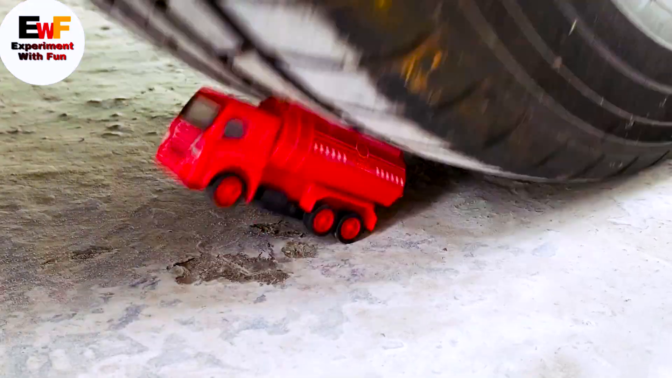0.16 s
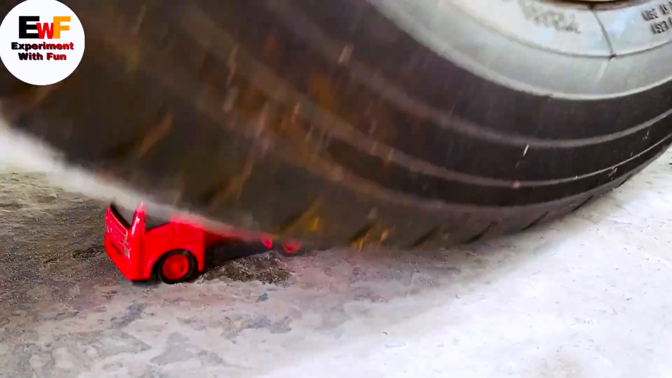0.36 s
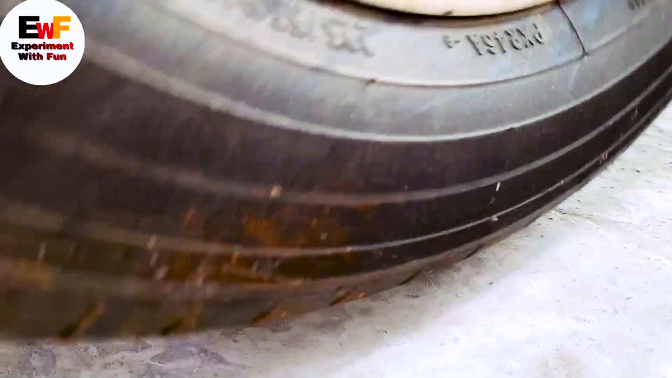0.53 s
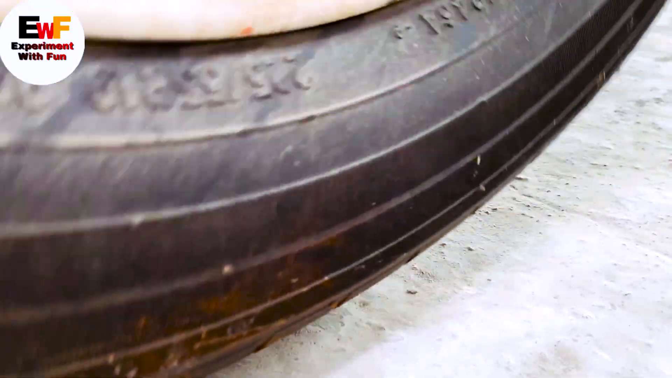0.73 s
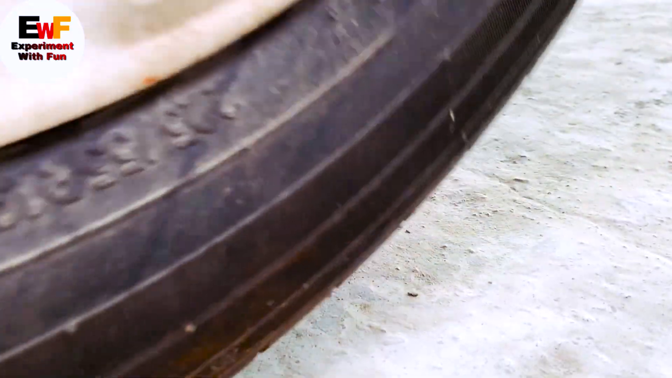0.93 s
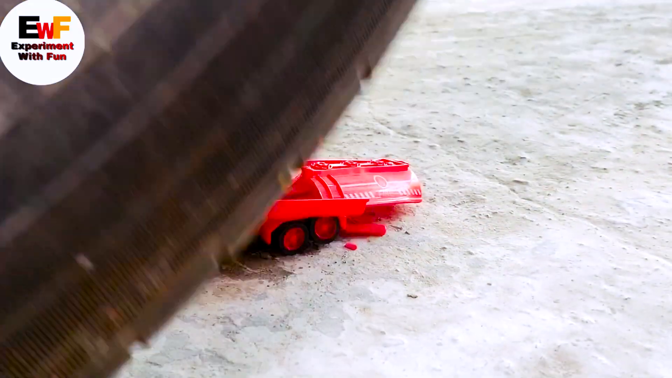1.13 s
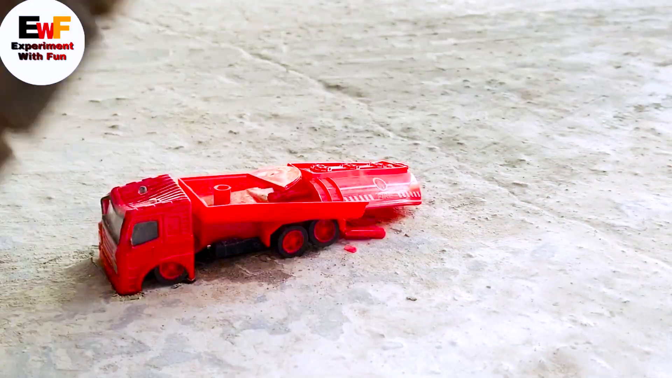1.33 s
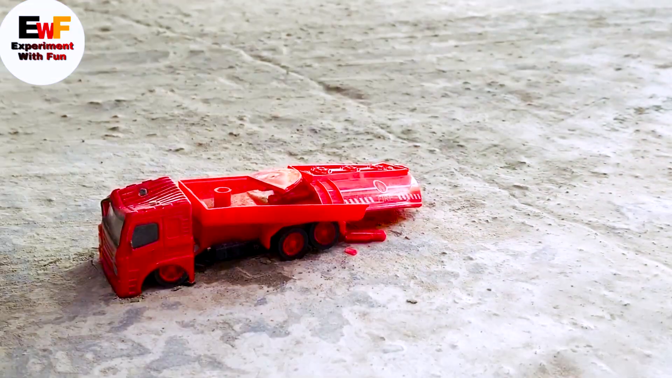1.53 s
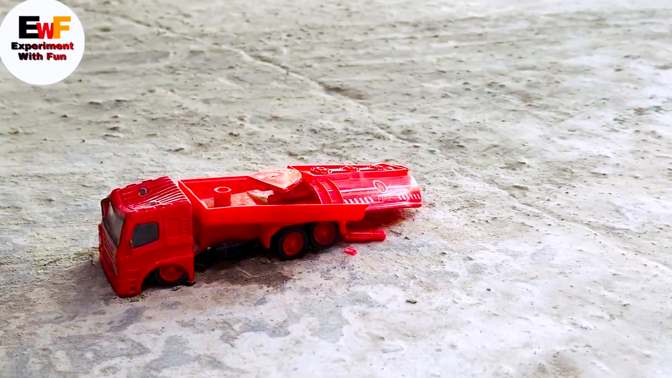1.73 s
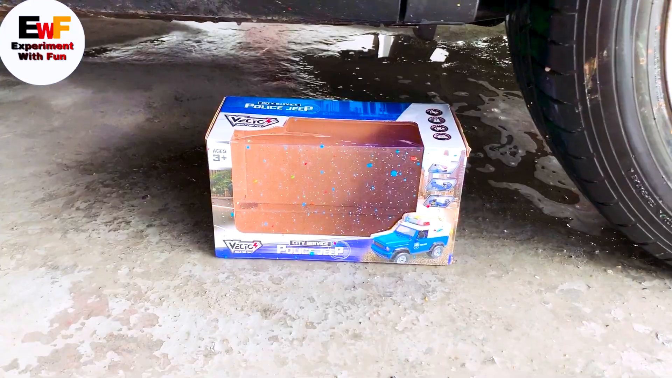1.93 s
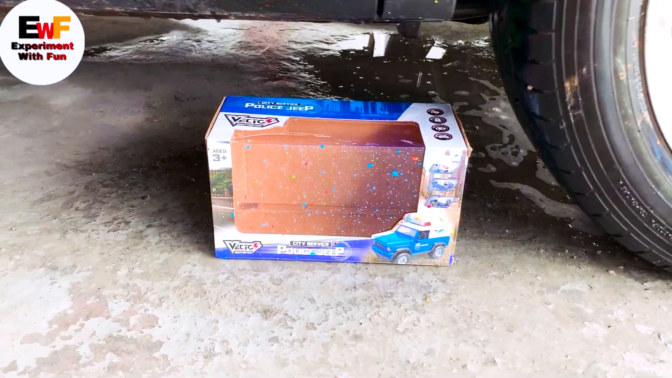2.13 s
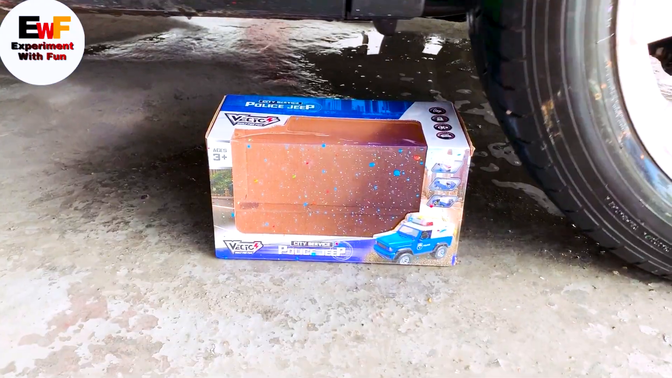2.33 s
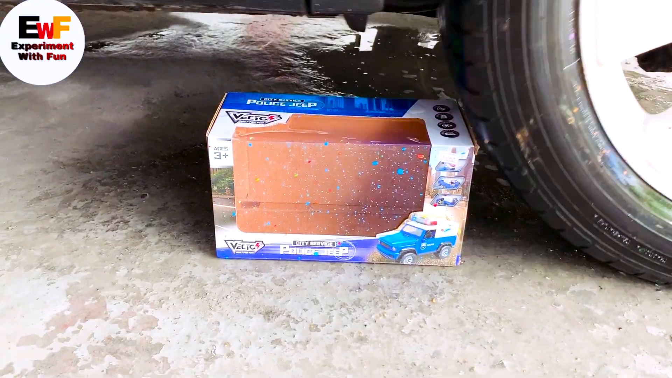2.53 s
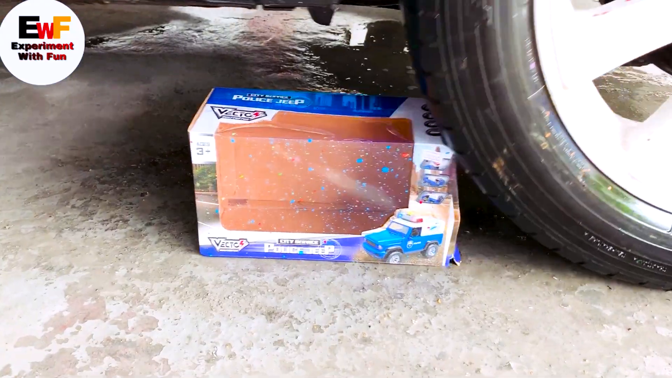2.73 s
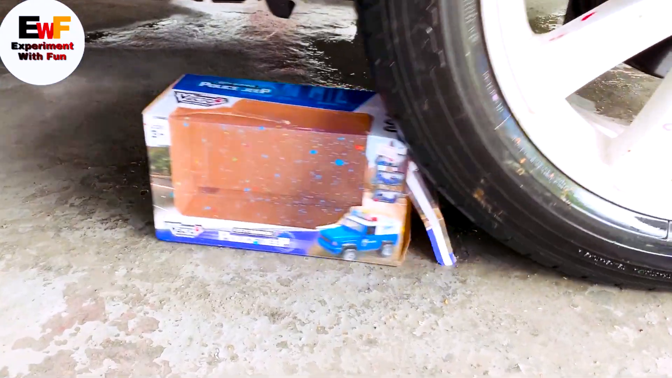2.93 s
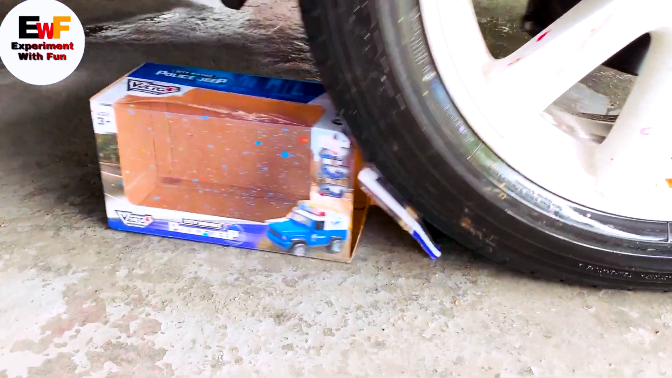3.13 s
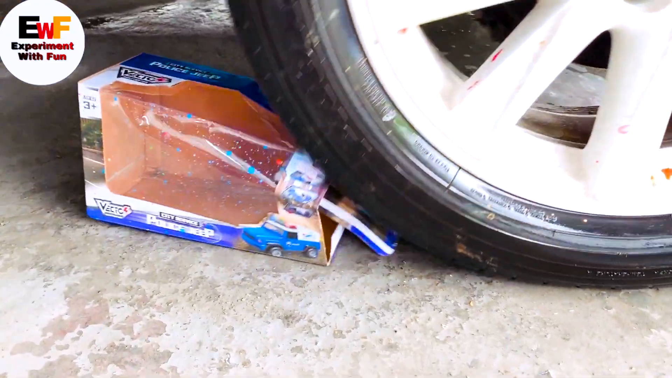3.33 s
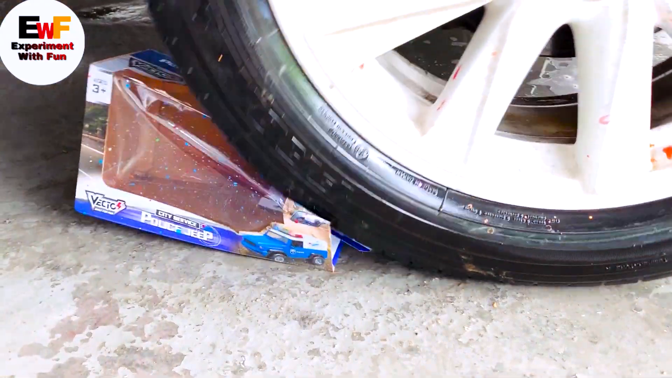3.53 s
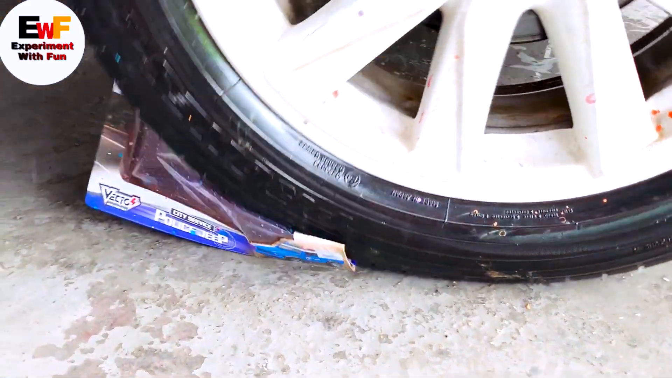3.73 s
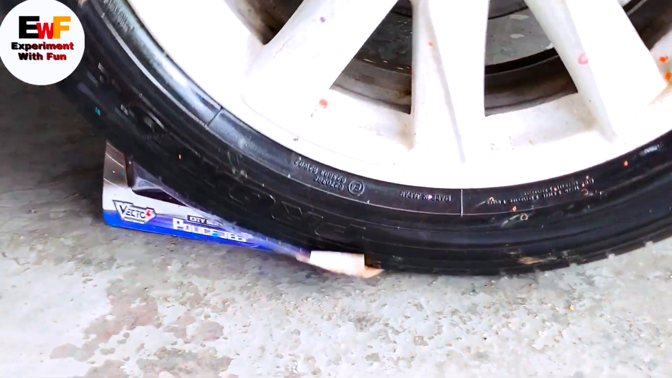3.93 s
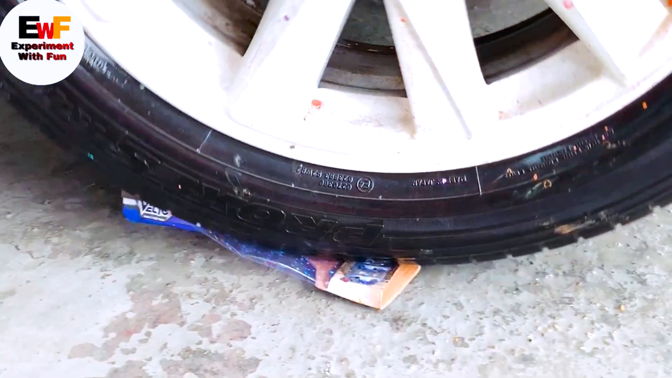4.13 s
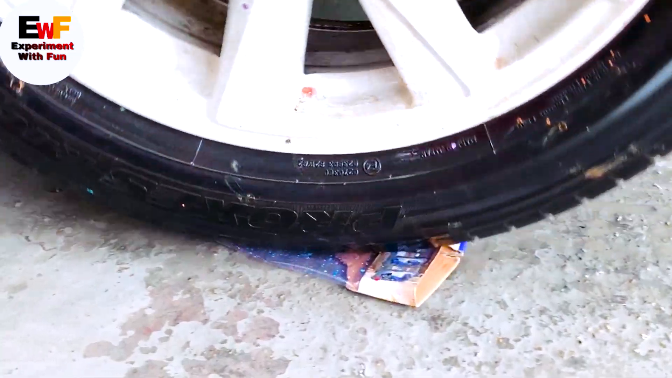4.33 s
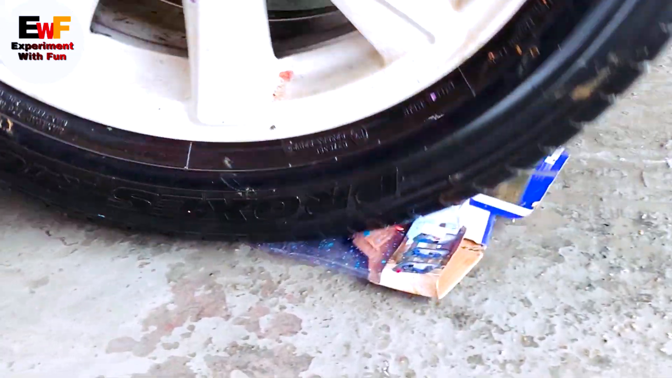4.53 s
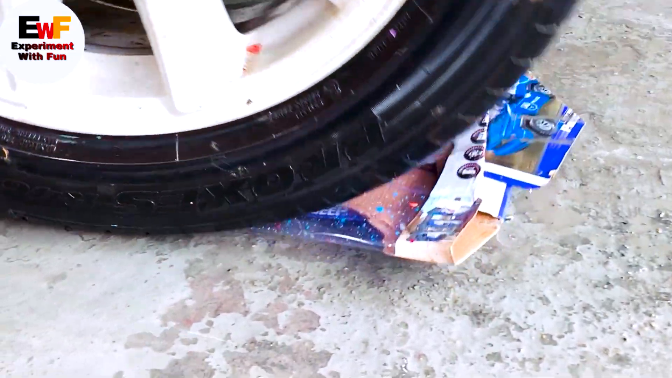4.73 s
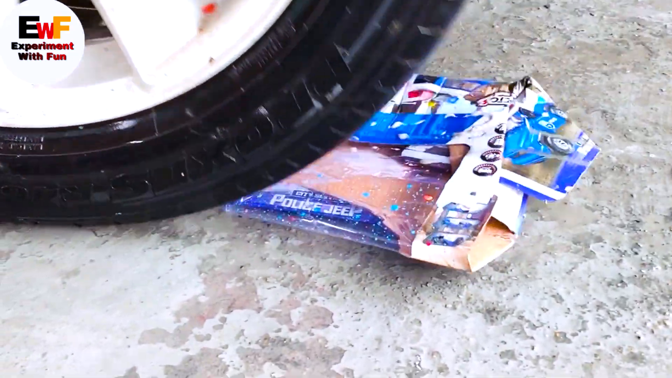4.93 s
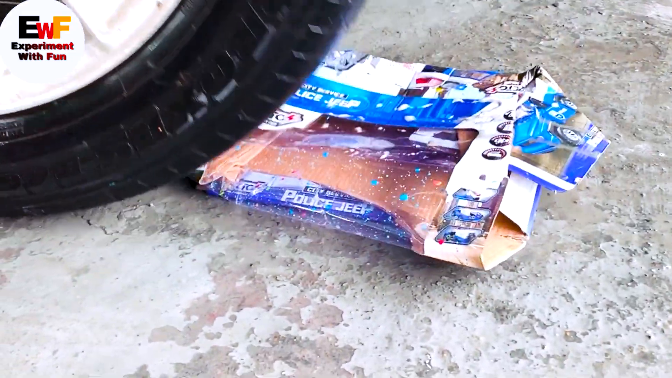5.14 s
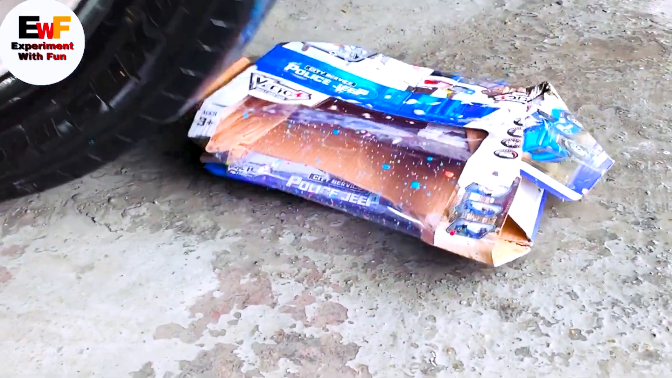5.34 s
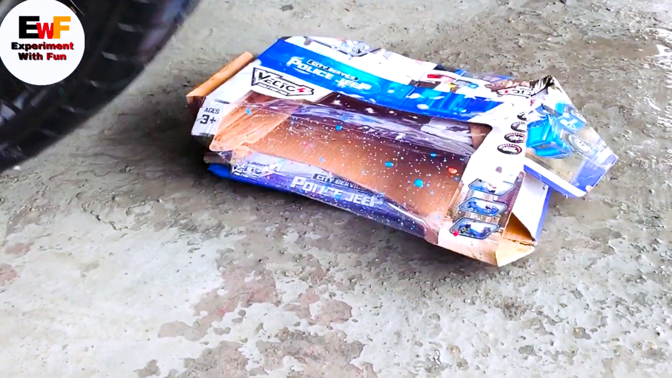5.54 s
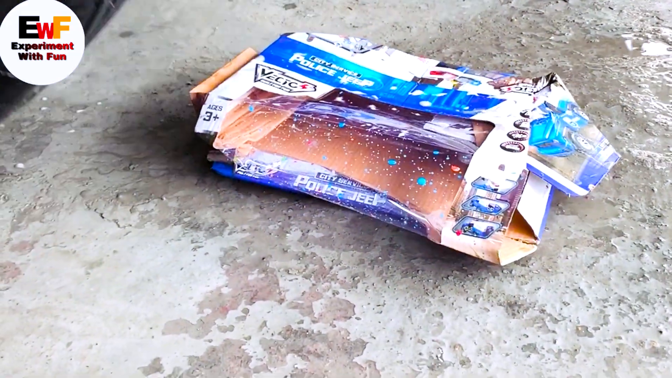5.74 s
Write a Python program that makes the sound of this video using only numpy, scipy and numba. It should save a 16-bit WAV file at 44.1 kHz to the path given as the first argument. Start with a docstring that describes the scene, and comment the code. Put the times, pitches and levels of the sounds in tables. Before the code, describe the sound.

Over a low engine rumble, hard plastic cracks sharply under a tyre, then cardboard buckles, scrapes and crunches before a brake squeals faintly.

```python
"""An idling car, and at once a plastic toy lorry snapping under its tyre, whose air cavity rings on.
In a second scene the tyre crushes a cardboard box: it rumbles, scrapes and thuds, its plastic window
crackles, then a brake squeals. Both play out on concrete, heard from ground level through the two
microphone ports of a phone. The loudest blows overload the microphone."""
import sys
import numpy as np
from scipy import signal
from scipy.fft import rfft, irfft
from scipy.io import wavfile
from scipy.ndimage import uniform_filter1d
from numba import njit

SR = 44100
rng = np.random.default_rng(int(sys.argv[2]) if len(sys.argv) > 2 else 0)


def materialize(psi):
    """Save the field psi as 16-bit PCM at rate SR to the path in sys.argv[1].

    A 1-D psi becomes a single channel; in a 2-D psi each row is a channel.
    """
    bounded = np.clip(np.atleast_2d(psi).T, -1, 1)
    quanta = np.round(bounded * 32767).astype(np.int16)
    wavfile.write(sys.argv[1], SR, quanta)


N = 254456
TIME = np.arange(N) / SR
BOX_SCENE_S, WINDOW_S = 1.805, 3.87  # the second scene opens; the tyre reaches the window film
TOY_SCENE = TIME < BOX_SCENE_S


# The toy snapping on the concrete. Each row: start in seconds, level in dB, shard pitch in Hz,
# hollow body and splinter treble in dB against that level, t60 in seconds.
TOY_SNAPS = [(0.075, -19, 2090, -15, -15, 0.08), (0.101, -13.5, 1250, -25.5, -21.5, 0.066),
             (0.128, -7.5, 1270, -21, -14, 0.057), (0.137, -2, 2040, -16.5, -15, 0.021),
             (0.177, 3.5, 2370, -18.5, -11.5, 0.078), (0.199, 7, 1980, -21.5, -10, 0.022),
             (0.217, 4, 1820, -28.5, -13, 0.093), (0.236, 2, 2310, -33.5, -12, 0.05),
             (0.268, -16, 4090, -24.5, 2, 0.017), (0.291, -1, 2740, -30, -7, 0.023),
             (0.308, -18.5, 2330, -14, -4.5, 0.029), (0.334, -1.5, 703, -15.5, -9.5, 0.021),
             (0.345, -16.5, 2505, -7, 0.5, 0.073), (0.376, 3.5, 856, -7, -12.5, 0.053),
             (0.425, -0.5, 703, -8.5, -10, 0.041), (0.458, -26.5, 773, -11, -1.5, 0.049),
             (0.482, -12.5, 775, -12, -10.5, 0.043), (0.495, -12, 727, -8.5, -8, 0.03),
             (0.511, -22.5, 721, -11.5, -0.5, 0.027), (0.559, -34, 703, -4, 10.5, 0.035),
             (0.589, 2.5, 778, -19, -19, 0.024), (0.627, -20, 754, -18.5, 5.5, 0.019),
             (0.701, -16.5, 1770, -20, -4, 0.021), (0.788, -25.5, 1560, -17, -13, 0.022),
             (0.819, -21, 4270, -23, -3, 0.035), (0.836, -15.5, 3160, -24, -6.5, 0.039),
             (0.872, 4, 773, -6.5, -7.5, 0.058), (0.999, -34, 2040, -15, -10, 0.035),
             (1.141, -43.5, 953, -16, -16.5, 0.056)]
# The toy's hollow, then its walls. Each row: resonance in Hz, width in Hz, gain in dB.
TOY_HOLLOW = [(383, 21, -8), (625, 47, -8), (780, 270, -16)]
TOY_WALLS = [(1440, 24, -11.5), (1817, 140, 2.5), (2480, 53, 4), (2750, 18, 3.5), (4180, 69, -18),
             (6600, 200, -10), (8270, 130, 7.5)]
# Its splintering treble. Each row: frequency in Hz, noise density in dB.
TOY_SPLINTERS = [(3530, -38.5), (6000, -8.5), (6920, -3), (7680, 2.5), (8340, -5), (8860, 8.5), (9940, 2.5),
                 (11200, -22.5), (15500, -30)]

def toy():
    """The hollow plastic lorry breaks under the tyre, snap by snap."""
    return cracks(TOY_SNAPS, TOY_HOLLOW, TOY_WALLS, TOY_SPLINTERS)


# The box on the concrete: its folds, hollow, walls and splintering treble. Rows read as for the toy.
BOX_FOLDS = [(2.643, -15.5, 1393, -4.5, -20, 0.054), (2.846, -5, 2170, -10.5, -18, 0.078),
             (2.873, -9.5, 840, -1, -2, 0.011), (2.881, 6, 810, -11.5, -19.5, 0.041),
             (3.251, 2.5, 1430, 1, -40, 0.096), (3.396, -10, 1270, -11.5, -35, 0.074),
             (3.504, 4, 3315, -14, -9, 0.026), (3.528, 0, 1240, -6, -16.5, 0.049),
             (3.587, 3.5, 1150, -9, -25, 0.026), (3.631, 1.5, 3400, -12, -11, 0.032),
             (3.704, 6.5, 1003, -9, -17, 0.032), (3.789, -4.5, 1460, -9, -32, 0.064),
             (3.846, -0.5, 1015, -12, -12, 0.082), (3.878, 4.5, 1370, -38, -7, 0.016),
             (3.884, -1, 1031, -7, -25, 0.06), (3.911, 0.5, 1114, -8, -9, 0.071),
             (3.924, 3, 1110, -10, -5, 0.018), (3.961, -5, 4100, -10.5, -2.5, 0.019),
             (3.979, 4, 1130, -10, -15, 0.029), (4.011, -2, 1170, -10.5, -5.5, 0.028),
             (4.06, -12, 1075, -6, -5, 0.073), (4.077, -9, 2900, -13, -3, 0.032),
             (4.115, -2.5, 2130, -20.5, -14, 0.019), (4.126, -4, 1720, -17, -6, 0.016),
             (4.142, 1, 1140, -20.5, -6.5, 0.035), (4.173, -7, 1100, -15.5, -7, 0.032),
             (4.185, 7, 713, -9.5, -10.5, 0.011), (4.199, -14, 1680, -7.5, 2, 0.061),
             (4.211, 2, 1101, -14, -6.5, 0.033), (4.239, 2, 1422, -27, -11, 0.015),
             (4.269, -2, 1410, -19.5, -14, 0.03), (4.283, -11.5, 1340, -12, -20, 0.024),
             (4.315, -5, 1630, -13, -26, 0.013), (4.348, 1, 1720, -19, -20, 0.049),
             (4.38, -6, 987, -14, -34, 0.035), (4.43, -9.5, 3753, -22, -1.5, 0.034),
             (4.461, -11, 1370, -12, -4, 0.094), (4.483, -7, 1390, -32, -13, 0.096),
             (4.527, -6, 3210, -18.5, -13, 0.015), (4.543, -9, 1654, -53, -21, 0.034),
             (4.556, -4, 1440, -12, -12, 0.027), (4.578, -3, 1400, -41.5, -3, 0.029),
             (4.604, 1.5, 1390, -37, -3, 0.027), (4.616, -3.5, 1011, -22, -4, 0.036),
             (4.642, -6.5, 1700, -46, -7, 0.032), (4.667, -11.5, 1341, -26, -25, 0.011),
             (4.677, -2, 1360, -24, -5.5, 0.08), (4.793, -4, 1200, -35, -25, 0.036),
             (4.848, -19.5, 1077, -24, -25, 0.032), (4.889, -20, 4120, -18, -33, 0.019),
             (4.902, -14.5, 920, -16, -40, 0.044), (4.939, -23, 1150, -4.5, -33, 0.048),
             (5.032, -15.5, 964, -12, -29, 0.035), (5.235, -25, 1630, -16, -19, 0.05)]
BOX_HOLLOW = [(201, 92, -3.5), (331, 62, -3), (408, 77, 1.5), (530, 310, -7.5)]
BOX_WALLS = [(1060, 340, -11.5), (1440, 59, 5), (1650, 100, -5.5), (3430, 32, -0.5), (6270, 60, -21),
             (8800, 1400, -8)]
BOX_SPLINTERS = [(3530, -23), (6000, -1), (6980, -6), (8510, 3.5), (9590, -2.5), (11300, -17.5),
                 (12900, -15), (14500, -18.5), (15500, -18.5)]

def box():
    """The cardboard box folds and pops under the tyre."""
    return cracks(BOX_FOLDS, BOX_HOLLOW, BOX_WALLS, BOX_SPLINTERS)


# Breaking and scraping, heard from the ground. Each row: frequency in Hz, noise density in dB.
FRACTURE_COLOUR = [(290, -44.5), (500, -21.5), (804, -6.5), (1070, -3), (1400, -4.5), (1540, -5.5),
                   (2740, -4.5), (4210, -5.5), (7000, -12), (9100, -35.5), (15400, -120)]

def cracks(events, hollow_modes, wall_modes, splinter_colour, build_s=0.0012, strain_s=0.007):
    """Each crack is a ragged burst: a ringing shard, wall modes, bright splinters and the hollow behind."""
    start, db, shard_hz, hollow_db, treble_db, t60 = np.transpose(events)
    rise_s = build_s + 0.03 * t60  # longer cracks take longer to run through
    ragged = 0.45 + 0.49 * grit(rate_hz=700, spread_db=2.5, t60=0.0045)
    strain = bursts(start - strain_s, db - 44.5 + 347.5 * t60, strain_s, 0.5 * t60)
    snap = bursts(start, db - 9.5, rise_s=0.00035, t60=0.0062)
    breaking = bursts(start, db - 9.5, rise_s, t60)
    fracture = noise(FRACTURE_COLOUR) * ragged * (strain + snap + breaking)
    pitch = held(start, shard_hz)
    width = pitch / 11 * (pitch / 1000) ** 0.6
    shard = np.array([bandpass(port, pitch, width) for port in fracture])
    splinters = noise(splinter_colour) * ragged
    splinters *= bursts(start, db + treble_db + 3, 0.64 * rise_s, 0.92 * t60)
    walls = resonate(fracture + splinters, wall_modes)
    hollow = unit(resonate(noise(WHITE), hollow_modes))
    hollow *= bursts(start + 0.0022, db + hollow_db + 1.5, rise_s, 0.93 * t60)
    # a short scatter off the car's underside follows each crack to the microphone
    scatter = noise(FRACTURE_COLOUR) * bursts(start, db - 28, 2 * rise_s, t60=0.17)
    return fracture + splinters + undb(9) * shard + undb(2.5) * walls + hollow + scatter


# Dull blows as the box buckles. Each row: start in seconds, level in dB, opening pitch in Hz,
# t60 in seconds.
BOX_THUDS = [(2.64, -8.5, 477, 0.13), (2.659, -2.5, 87.3, 0.088), (2.69, -3.5, 79.2, 0.17),
             (2.736, 7.5, 366.7, 0.032), (2.785, -24, 102, 0.08), (2.843, -4.5, 112, 0.15),
             (2.884, 7, 403, 0.072), (2.952, 8, 430, 0.042), (2.971, -1.5, 142, 0.063),
             (3.009, -14, 117, 0.08), (3.065, -9, 127.1, 0.047), (3.126, -10.5, 146.3, 0.11),
             (3.194, 1.5, 81, 0.064), (3.217, 2.5, 150.3, 0.078), (3.257, 8.5, 145.3, 0.13),
             (3.291, -4, 393, 0.16), (3.35, 1.5, 93.5, 0.043), (3.395, -3, 434, 0.048),
             (3.527, -3.5, 360, 0.12), (3.585, 1.5, 522, 0.057), (3.629, -12.5, 345, 0.21),
             (3.703, 4.5, 425, 0.046), (3.787, -7, 186, 0.085), (3.847, -2.5, 463.5, 0.097),
             (3.892, -5, 204.4, 0.098), (3.974, -3, 505, 0.071), (4.057, -1.5, 223, 0.065),
             (4.213, -5.5, 373, 0.055), (4.614, 4.5, 117.6, 0.018)]

def thuds():
    """Cardboard panels pop through and swing a few cycles, sagging in pitch."""
    out, t = np.zeros(N), np.arange(SR // 4) / SR
    rattle = 1 + 0.61 * wander(350)  # creased card rattles as it swings
    attack = 1 - np.exp(-t / 0.0035)
    for start, db, hz, t60 in BOX_THUDS:
        span = slice(int(start * SR), int(start * SR) + len(t))
        swing = np.sin(2 * np.pi * hz * t * (1 - 1.27 * t)) * rattle[span]
        out[span] += undb(db - 0.5) * attack * 1000. ** (-t / t60) * swing
    return out


# Grinding at ground level, one list a scene. Each row: time in seconds, scrape in dB, panel rumble in dB.
GRINDING = [
    [(0.06, -46, -63), (0.134, -26.5, -30.5), (0.26, -28, -37), (0.32, -34, -56.5), (0.4, -27.5, -32),
     (0.468, -32.5, -35.5), (0.56, -40, -55), (0.636, -34.5, -46), (0.77, -46.5, -56.5),
     (0.896, -35.5, -35), (1.15, -61.5, -75.5)],
    [(2.56, -56, -46.5), (2.67, -26.5, -24.5), (2.82, -24.5, -25), (3.03, -19, -22), (3.41, -23.5, -23),
     (3.8, -36.5, -29), (4.02, -11.5, -25.5), (4.1, -22.5, -31.5), (4.28, -23.5, -47), (4.48, -28.5, -45),
     (4.58, -13, -39), (4.75, -27.5, -37.5), (5.0, -77, -42.5)],
]

def grinding():
    """The load grinds the pieces over the concrete; their walls colour the scrape."""
    scrape_db, panel_db = curves(GRINDING)
    pressing = sum((TIME > rows[0][0]) & (TIME < rows[-1][0]) for rows in GRINDING)
    stage = np.searchsorted([BOX_SCENE_S, WINDOW_S], TIME)  # toy, bare cardboard, window film
    treble_db = scrape_db + np.array([-9, -11, -4])[stage]
    treble_db += 0.1442 * (scrape_db + 29)  # harder scraping is brighter
    load = np.clip((scrape_db + 47) / 12, 0, 1)  # crackle dies out as the scrape grows faint
    crackle_share = np.array([0.16, 0.33, 0.7])[stage] * load
    grain = 1 - crackle_share + crackle_share * grit(rate_hz=320, spread_db=3.3, t60=0.007)
    panel = unit(resonate(noise(WHITE), [(89.5, 60, 0.003)] + BOX_HOLLOW)) * undb(3.2 * wander(28))
    scrape = undb(scrape_db - 3.5) * noise(FRACTURE_COLOUR)
    treble = undb(treble_db) * np.where(TOY_SCENE, noise(TOY_SPLINTERS), noise(BOX_SPLINTERS))
    rub = grain * (scrape + treble)
    walls = np.where(TOY_SCENE, undb(4) * resonate(rub, TOY_WALLS), resonate(rub, BOX_WALLS))
    for hz in (1100, 1900, 3400):  # bending panels add hollow colours that drift, come and go
        centre = hz * np.exp(0.18 * wander(14))
        band = np.array([bandpass(port, centre, centre / 7) for port in rub])
        walls += undb(4 * wander(22.1) - 6.5) * band
    return pressing * (rub + undb(4.5) * walls + undb(panel_db + 1.5) * panel)


# The box's plastic window under the tyre. Each row: start in seconds, level in dB.
FILM_TICKS = [(3.9454, -27.5), (3.9962, 3), (4.0291, 8.5), (4.2548, -2), (4.2955, -19), (4.329, -9),
              (4.3588, -7), (4.389, -12), (4.4972, -6.5), (4.5118, -1), (4.5691, -2), (4.5904, -6),
              (4.6264, -3), (4.6917, 0.5), (4.7521, -18), (4.8279, -19), (4.8344, -22), (4.9616, -31),
              (5.1452, -25), (5.6476, -31)]

def window_film():
    """Creases in the film flip with a dry tick a few milliseconds long."""
    start, db = np.transpose(FILM_TICKS)
    ticks = bursts(start, db - 8.5, rise_s=0.0005, t60=0.014)
    return ticks * (noise(BOX_SPLINTERS) + undb(-1.5) * noise(FRACTURE_COLOUR))


# The toy's blows to the tyre. Each row: start in seconds, first thump in dB, lasting ring in dB.
TYRE_BLOWS = [(0.38, -12, -26), (0.591, -36, -27.5), (0.882, -6.5, -45.5)]
# The air inside the tyre. Each row: multiple of the cavity pitch, gain in dB.
CAVITY_PARTIALS = [(0.998, 2.5), (1.979, -23.5), (2.95, -15.5), (3.881, -16.5)]

def tyre_cavity(cavity_hz=198.6, drop_hz=115, thump_t60_s=0.051, ring_t60_s=1.6):
    """Each blow gives the tyre's air a quick thump and a long ring, which takes over from the ring before it."""
    start, thump_db, ring_db = np.transpose(TYRE_BLOWS)
    since = TIME - held(start, start)
    thump = undb(held(start, thump_db) - 60 * since / thump_t60_s)
    ring = undb(held(start, ring_db) - 60 * since / ring_t60_s)
    pitch = cavity_hz * (1 + 0.015 * np.exp(-np.abs(since) / 0.06))  # starts sharp and settles
    air = (thump + ring) * tone(pitch, 0, CAVITY_PARTIALS, waver=0.004, flutter_db=1.8)
    drop = undb(-3) * thump * np.sin(2 * np.pi * drop_hz * since)  # the tyre drops with a deep thump
    return (since > 0) * TOY_SCENE * (air + drop)


# A squeak among the toy's first snaps. Each row: time in seconds, pitch in Hz, level in dB.
TOY_SQUEAK = [(0.163, 8002, -36), (0.175, 8003, -16), (0.183, 8028, -18)]

def squeak():
    """Plastic chirps on plastic for a moment."""
    hz, db = curves([TOY_SQUEAK])
    rubbing = (TIME > TOY_SQUEAK[0][0]) & (TIME < TOY_SQUEAK[-1][0])
    return rubbing * tone(hz, db, [(1, 3)], waver=0.003, flutter_db=0.6)


# Brake grabs at the wheel, back to back. Each row: start in seconds, pitch in Hz, level in dB.
BRAKE_GRABS = [(4.745, 13320, -32), (4.805, 13355, -26), (4.865, 13350, -28), (4.93, 13430, -31),
               (5.0, 13525, -32), (5.064, 13485, -32), (5.13, 13510, -28), (5.2, 13615, -22)]
# The squeal and two fainter tones below it. Each row: multiple of the pitch, gain in dB.
BRAKE_PARTIALS = [(1, 0), (.714, -25), (.426, -17)]

def brake(release_s=5.243, echo_db_per_s=-165):
    """The squeal swells and dips with each grab; after the release its blurred echo dies away."""
    start, hz, db = np.transpose(BRAKE_GRABS)
    edges = np.r_[start, release_s]
    middle = (edges[1:] + start) / 2
    grabs = np.interp(TIME, edges, np.arange(len(edges)))
    swell = np.abs(np.sin(np.pi * grabs)) + undb(-11)
    pitch, level_db = np.interp(TIME, middle, hz), np.interp(TIME, middle, db) - 2
    squeal = (TIME > start[0]) * swell * tone(pitch, level_db, BRAKE_PARTIALS, waver=0.0015, flutter_db=2.5)
    echo = noise([(13200, -60), (13450, 0), (13650, 0), (13900, -60)])
    echo *= undb(-41 + echo_db_per_s * np.maximum(TIME - release_s, 0))
    return np.where(TIME < release_s, squeal, echo)


# The engine and the low rumble of the crushing, from the ground, one list a scene. Each row: time in
# seconds, firing rate in Hz, level of exhaust and rumble together in dB (swelling as the box is
# crushed), drone in dB, fan and valve gear in dB.
ENGINE_AND_RUMBLE = [
    [(0.0, 22.94, -31.5, -22.5, -42), (0.2, 23.44, -37.5, -43, -40), (0.6, 22.76, -42, -33.5, -40.5),
     (0.8, 22.66, -37, -28.5, -51), (0.98, 22.36, -50.5, -45, -56), (1.5, 21.82, -55, -47, -62),
     (1.79, 21.7, -55, -53, -60.5)],
    [(1.81, 19, -34.5, -31.5, -43), (2.47, 19.5, -36, -43, -44), (2.8, 19.5, -27, -28.5, -41.5),
     (3.3, 20.9, -24, -30.5, -38), (3.65, 21.3, -28, -33, -34.5), (4.3, 20.3, -27.5, -28, -35.5),
     (4.62, 22.4, -29.5, -22.5, -41.5), (5.03, 20.1, -40, -34, -47.5), (5.44, 19.7, -35, -29.5, -45.5),
     (5.77, 19.5, -35, -34, -46.5)],
]
# The exhaust. Each row: resonance in Hz, width in Hz, gain in dB.
EXHAUST_MODES = [(41.27, 2.8, -6), (65.6, 20.3, -1), (120, 38, -3), (182, 84, -23), (307, 25, -21.5)]
# Low rumble, then fan hiss. Each row: frequency in Hz, noise density in dB.
RUMBLE_COLOUR = [(15, -12), (32, -5), (48, 2.5), (62, 0), (102, -12), (166, -22.5), (252, -19), (400, -19),
                 (880, -66)]
FAN_COLOUR = [(88, -30.5), (150, -0.5), (366, -21), (530, -12), (751, -23.5), (3410, -26.5), (5130, -31),
              (8330, -36.5), (9730, -39.5), (11400, -52.5), (13000, -44.5), (14300, -56), (15500, -83.5)]

def engine_and_rumble(drone_order=4.95):
    """Firings ring the exhaust, the engine bay drones, valves tick in fan hiss; the crushing rumbles."""
    firing_hz, low_db, drone_db, gear_db = curves(ENGINE_AND_RUMBLE)
    firings = np.cumsum(firing_hz * (1 + 0.0087 * wander(12))) / SR
    strength = undb(3.3 * rng.standard_normal(N // 100))[firings.astype(int)]
    pulses = np.diff(np.floor(firings), prepend=0) * strength
    exhaust = undb(low_db + np.where(TOY_SCENE, 6, 2)) * unit(resonate(pulses, EXHAUST_MODES))
    valve_phase = np.pi * (firings - 0.35)
    ticks = np.cos(valve_phase) ** 6 + 0.4 * np.sin(valve_phase) ** 6  # one strong, one weak per firing
    valves = ticks * noise([(3000, -34), (8500, 2), (11500, -13), (13000, -13.5), (15500, -33)])
    fan = undb(wander(9)) * noise(FAN_COLOUR)
    drone = tone(drone_order * firing_hz, drone_db, [(1, 0)], waver=0.015, flutter_db=1.5)
    rumble = undb(low_db + np.where(TOY_SCENE, 1, 4.5)) * noise(RUMBLE_COLOUR)
    return exhaust + rumble + drone + undb(gear_db + 3.5) * (fan + undb(-12) * valves)


# A flat colour. Each row: frequency in Hz, noise density in dB.
WHITE = [(20, 0), (20000, 0)]
# How alike the two microphone ports hear noise. Each row: frequency in Hz, likeness from 0 to 1.
PORT_LIKENESS = [(100, .96), (400, .94), (1000, .78), (2500, .62), (5000, .48), (9000, .65), (14000, .82)]

def noise(colour):
    """Coloured noise at the two ports, alike in the bass and looser above; rms 1."""
    mid, side = rfft(rng.standard_normal((2, N)))
    alike = per_bin(PORT_LIKENESS)
    pair = np.sqrt(1 + alike) * mid + np.sqrt(1 - alike) * side * np.array([[1], [-1]])
    return unit(irfft(pair * undb(per_bin(colour)), N))


def tone(hz, db, partials, waver, flutter_db):
    """Sine partials, unsteady together in pitch and level."""
    phase = 2 * np.pi * np.cumsum(hz * (1 + waver * wander(55))) / SR
    level = np.sqrt(2) * undb(db + flutter_db * wander(45))
    return level * sum(undb(gain_db) * np.sin(ratio * phase) for ratio, gain_db in partials)


def bursts(start, db, rise_s, t60):
    """Sum of envelopes that build while a break runs and then die away."""
    out, t = np.zeros(N), np.arange(SR // 3) / SR
    rise_s, t60 = np.clip(rise_s, 0.0003, 0.02), np.clip(t60, 0.004, 0.4)
    for onset, gain, rise, decay in np.broadcast(start, undb(db), rise_s, t60):
        i = int(onset * SR)
        shape = np.where(t < rise, 0.4 + 0.79 * t / rise, 1000. ** ((rise - t) / decay))
        out[i:i + len(t)] += gain * shape[:N - i]
    return out


def grit(rate_hz, spread_db, t60):
    """Envelope of many tiny fractures of very unequal size; rms 1."""
    hits = (rng.random(N) < rate_hz / SR) * undb(spread_db * rng.exponential(size=N))
    return unit(signal.lfilter([1], [1, -1000. ** (-1 / (t60 * SR))], hits))


def resonate(x, modes):
    """Drive a body's resonances, summed with alternating sign."""
    return sum((-1) ** k * undb(db) * signal.lfilter(*signal.iirpeak(hz, hz / width, SR), x)
               for k, (hz, width, db) in enumerate(modes))


@njit
def bandpass(x, hz, width):
    """State-variable band-pass with a moving centre, gain 1 there."""
    out, band_state, low_state = np.empty(len(x)), 0., 0.
    for i in range(len(x)):
        g, damping = np.tan(np.pi * hz[i] / SR), width[i] / hz[i]
        band = (band_state + g * (x[i] + 1e-18 - low_state)) / (1 + g * (g + damping))
        band_state, low_state = 2 * band - band_state, low_state + 2 * g * band
        out[i] = damping * band
    return out


def wander(rate_hz):
    """Random steps, smoothed twice; spread near 1."""
    hold = int(SR / rate_hz)
    steps = np.repeat(rng.standard_normal(N // hold + 1), hold)
    return 1.3 * uniform_filter1d(uniform_filter1d(steps, hold), hold)[:N]


def held(start, values):
    """Each value lasts until the next event."""
    return values[np.maximum(np.searchsorted(start, TIME) - 1, 0)]


def curves(tables):
    """Join timed tables end to end and read every column at each sample."""
    seconds, *columns = np.vstack(tables).T
    return [np.interp(TIME, seconds, column) for column in columns]


def per_bin(table, size=N):
    """Read a (Hz, value) table at each transform bin."""
    hz, values = np.transpose(table)
    return np.interp(np.log(np.arange(size // 2 + 1) * SR / size + 1), np.log(hz), values)


def undb(db):
    return 10 ** (np.asarray(db) / 20)


def unit(x):
    return x / np.sqrt(np.mean(x ** 2))


def scene():
    """The car crushes the toy, then the box, and brakes."""
    return (engine_and_rumble() + thuds() + grinding() + window_film() + toy() + box()
            + tyre_cavity() + squeak() + brake())


# The phone's two ports, down on the concrete. Each row: frequency in Hz, left minus right in dB.
PORT_BALANCE = [(60, -1.0), (110, -1.0), (200, -0.5), (380, -0.5), (700, 1.5), (1290, 4.0), (2380, 3.0),
                (4400, 0.5), (8120, -3.5), (15000, -1.5)]
# Their phase, one list a scene. Each row: frequency in Hz, lead of the left port in radians.
PORT_LEAD = ([(0, 0), (1980, 1.7), (4310, 6.8), (5860, 12.3), (8530, 18.8), (9820, 23.9), (11300, 20.6),
             (15200, 26)], [(0, 0), (350, 0.35), (690, 0.5), (950, -0.2), (1640, -0.5), (2930, 2.2),
             (3360, 0.4), (4650, 2.8), (6890, 3.4), (11000, -2.9), (15200, -9.1)])
# The microphone's narrower pick-up in the toy scene. Each row: frequency in Hz, gain in dB.
TOY_PICKUP = [(20, -27), (45, -1), (350, -1), (1000, -1), (10500, -3), (12000, -3.5), (15500, -8)]

def record(dry, top_hz=15650, pad=2048):
    """The two ports colour and delay each scene differently; peaks clip and the top is filtered off."""
    sides, size = np.array([[0.5], [-0.5]]), N + 2 * pad
    hz = np.arange(size // 2 + 1) * SR / size
    spectrum = rfft(np.pad(dry, ((0, 0), (pad, pad)), "reflect"))
    spectrum *= undb(sides * per_bin(PORT_BALANCE, size))
    toy_phase, box_phase = (sides * np.interp(hz, *np.transpose(lead)) for lead in PORT_LEAD)
    toy_scene = irfft(spectrum * np.exp(1j * toy_phase) * undb(per_bin(TOY_PICKUP, size)), size)
    box_scene = irfft(spectrum * np.exp(1j * box_phase), size)
    ports = np.where(TOY_SCENE, toy_scene[:, pad:-pad], box_scene[:, pad:-pad])
    lowpass = signal.ellip(8, 0.2, 40, top_hz, fs=SR, output="sos")
    return signal.sosfilt(lowpass, np.clip(ports, -1, 1))


dry = scene()
out = record(dry)
materialize(out)
```